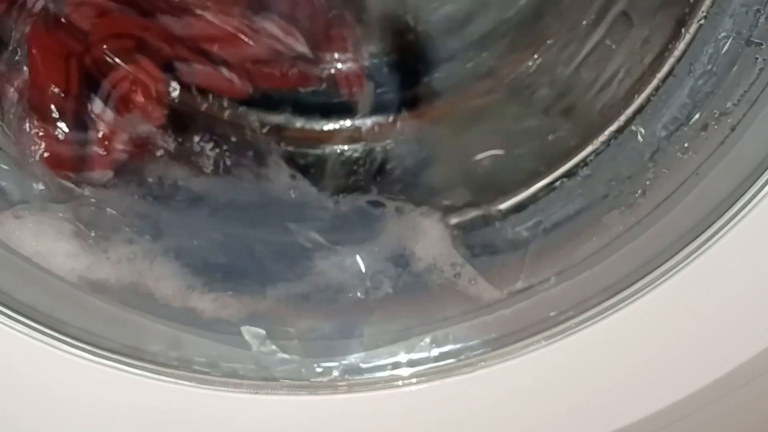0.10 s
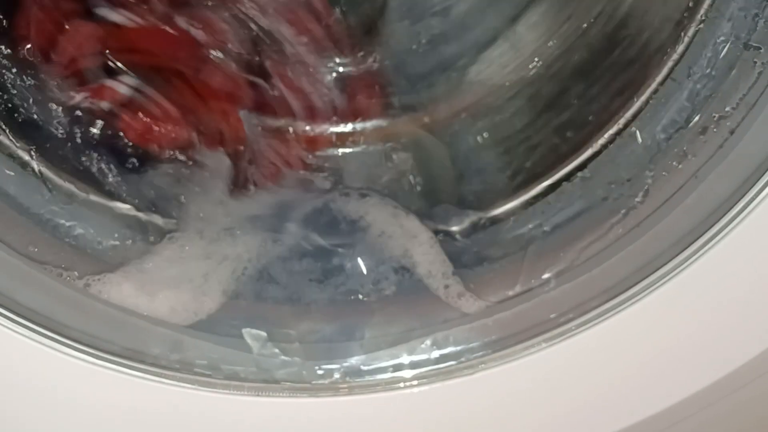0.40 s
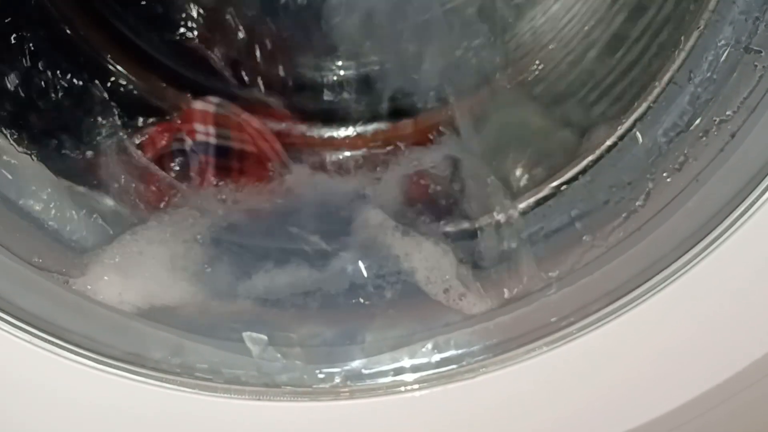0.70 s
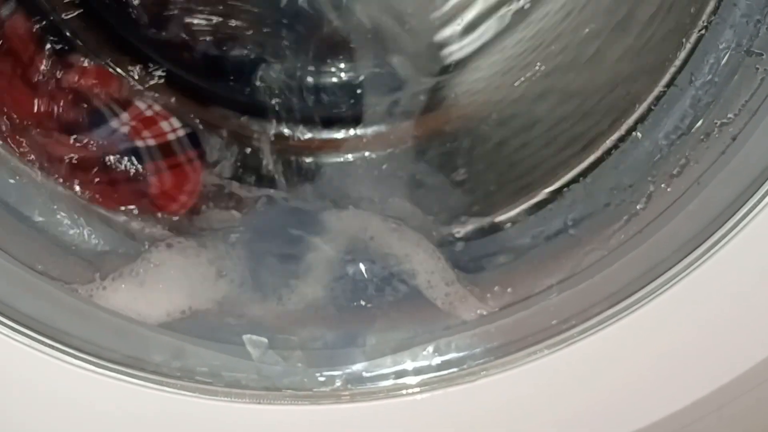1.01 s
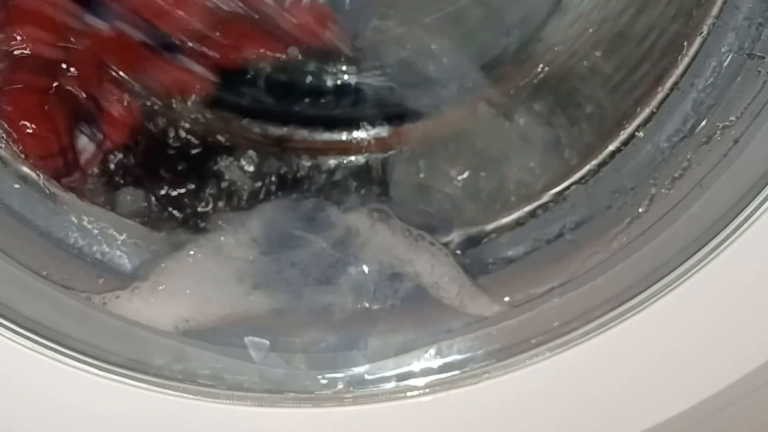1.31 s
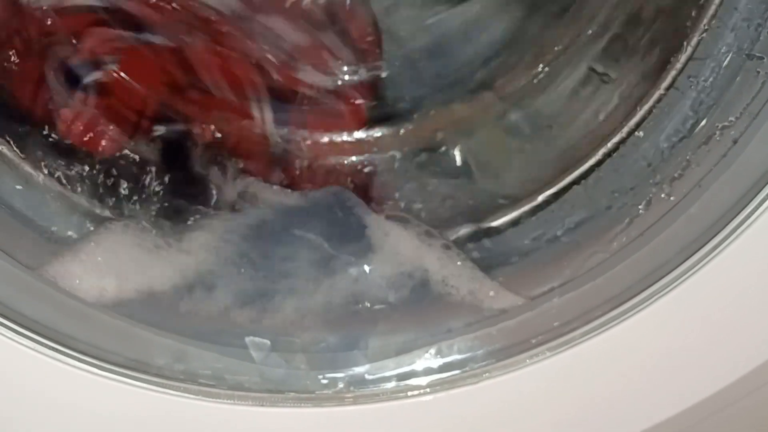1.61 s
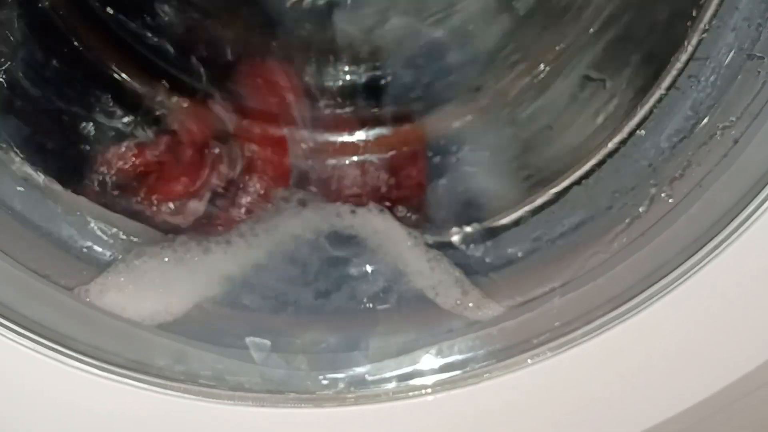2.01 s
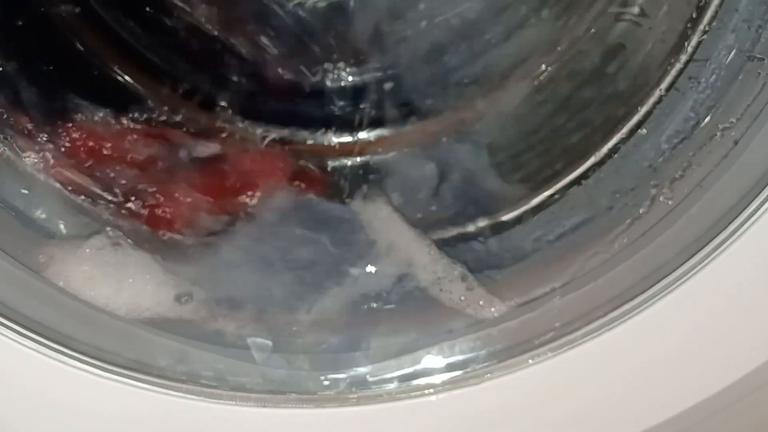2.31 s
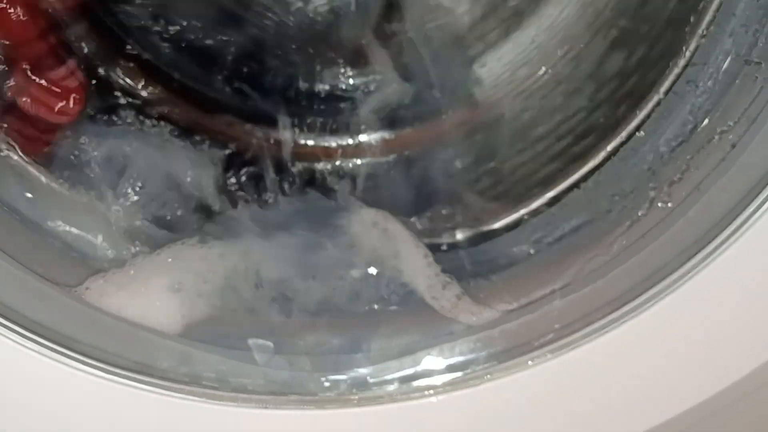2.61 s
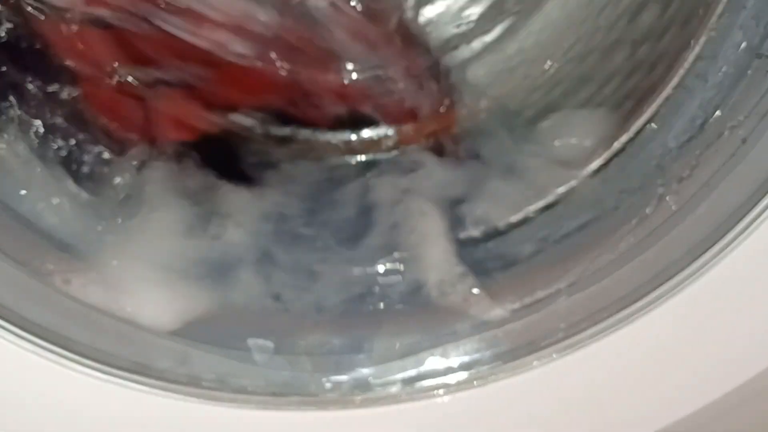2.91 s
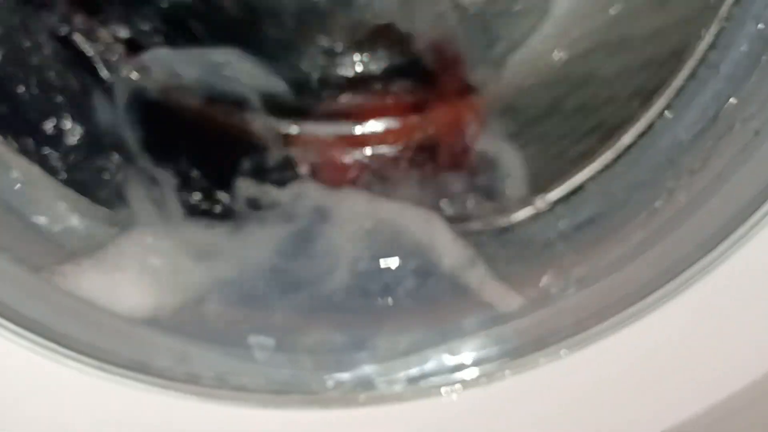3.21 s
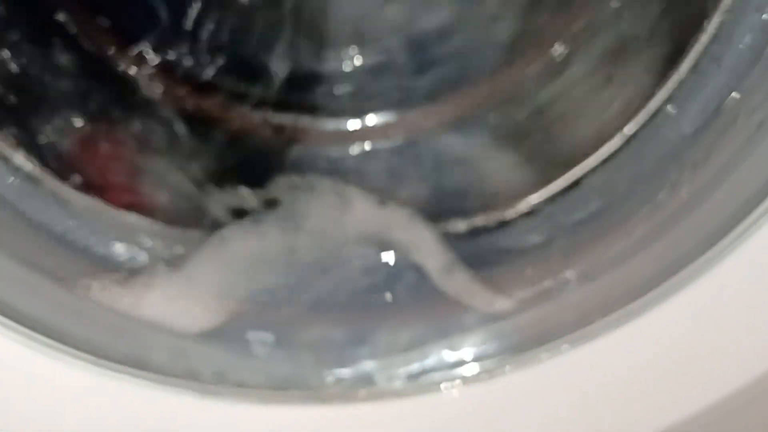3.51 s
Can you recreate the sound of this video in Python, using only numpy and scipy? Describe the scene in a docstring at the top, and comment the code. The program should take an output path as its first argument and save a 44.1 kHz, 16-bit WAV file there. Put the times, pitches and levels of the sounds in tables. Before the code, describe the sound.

A washing machine sloshes throughout, close at the glass door, with hissing suds, fine bubbling and low churning in a resonant tub. Wet laundry slaps and thuds from 0.2 s; a hard knock cracks at 0.35 s, then a heavy thud with a tick near 0.6 s. Softer thuds follow around 1.0, 1.7 and 2.1 s, with a gurgle at 2.2 s, a broad thump at 3.2 s and gurgling at 3.65 s.

```python
"""Washing machine tumbling wet laundry

A front loader heard close to the glass door. Churning water and falling cloth ring the tub's modes; short low
pushes give the thuds punch. Suds hiss as shaped random spectra, with sine-pip bubbles, ringing gurgles,
noise-burst slaps and ticks on the glass. One hard part of a garment knocks on the door: decaying sines and a
noise crack. The left microphone port is turned away and hears less treble."""
import sys
import numpy as np
from scipy import signal
from scipy.fft import rfft, irfft
from scipy.io import wavfile
from scipy.ndimage import uniform_filter1d

SR = 44100
rng = np.random.default_rng(int(sys.argv[2]) if len(sys.argv) > 2 else 0)


def materialize(psi):
    """Save the field psi as 16-bit PCM at rate SR to the path in sys.argv[1].

    A 1-D psi becomes a single channel; in a 2-D psi each row is a channel.
    """
    bounded = np.clip(np.atleast_2d(psi).T, -1, 1)
    quanta = np.round(bounded * 32767).astype(np.int16)
    wavfile.write(sys.argv[1], SR, quanta)


N = 163170
T = np.arange(N) / SR

# swells of the splash: (time [s], mids [dB], treble [dB], fine spray [dB]), relative levels
SWELLS = [(0.0, -48.5, -54, -67.5), (0.15, -48, -51.5, -62.5), (0.35, -44, -50, -61),
          (0.48, -48, -49, -62.5), (0.65, -45, -48.5, -62.5), (0.79, -50, -52, -65),
          (1.02, -47.5, -52.5, -65.5), (1.15, -46, -48.5, -63), (1.28, -45.5, -50.5, -63),
          (1.47, -48.5, -50.5, -64), (1.72, -48.5, -51, -64.5), (2.0, -47.5, -53.5, -65),
          (2.2, -47, -47.5, -64.5), (2.43, -49, -50.5, -65), (3.0, -47, -50.5, -62.5),
          (3.22, -49, -49.5, -65.5), (3.4, -49, -54.5, -66), (3.7, -51.5, -48.5, -63.5)]
# spectrum of the suds: (frequency [Hz], level [dB])
SUDS_SPECTRUM = [(60, -30.5), (300, 13.5), (430, -12), (800, -1.5), (1300, -3.5), (2000, -6.5), (2900, -16),
                 (3700, -13.5), (5300, -17.5), (6200, -25.5), (8000, -31.5), (10000, -28.5), (12000, -26),
                 (14000, -27.5), (15700, -31)]
# spectrum of the push of the water on the tub: (frequency [Hz], level [dB])
PUSH_SPECTRUM = [(40, -24), (70, 0.5), (900, -3), (2000, -27), (5000, -62)]
TUB_ALIKE = 0.96  # correlation of the noise drive between the ports
BUBBLE_CLIMB = 0.047  # scales the pitch climb of bubbles and gurgles


def gain_of(db):
    """Amplitude factor of a level in dB."""
    return 10 ** (np.asarray(db) / 20)


def evened(x):
    """Scales to an RMS of 1."""
    return x / np.sqrt(np.mean(x ** 2) + 1e-20)


def read(points, hz):
    """Interpolates a (frequency, value) table over log frequency."""
    f, value = np.transpose(points)
    return np.interp(np.log(hz + 1), np.log(f + 1), value)


def coloured(x, points):
    """Filters by a (frequency [Hz], level [dB]) table."""
    n = x.shape[-1]
    return irfft(rfft(x) * gain_of(read(points, np.fft.rfftfreq(n, 1 / SR))), n)


def resonate(x, hz, width_hz):
    """Two-pole resonance of gain 1 at its peak."""
    return signal.lfilter(*signal.iirpeak(hz, hz / width_hz, SR), x)


def band(x, hz, width_share):
    """Two equal resonances in a row, each as wide as a share of its pitch."""
    return resonate(resonate(x, hz, hz * width_share), hz, hz * width_share)


def add(mix, start_s, sound):
    """Adds a sound from a given time, cut at the end of the mix."""
    part = mix[..., round(start_s * SR):][..., :sound.shape[-1]]
    part += sound[..., :part.shape[-1]]


def pair(n, alike):
    """White noise for two ports with a given correlation."""
    a, b = rng.standard_normal((2, n))
    return np.array([a, alike * a + np.sqrt(1 - alike ** 2) * b])


def drift(samples):
    """Slow random curve of RMS 1: noise averaged twice."""
    once = uniform_filter1d(rng.standard_normal(N), size=samples)
    return evened(uniform_filter1d(once, size=samples))


def burst(start_s, length_s, rise_s):
    """Envelope of thuds and slaps: linear rise, hold, exponential fall."""
    fall_s = 0.02
    rise = np.clip((T - start_s) / rise_s, 0, 1)
    return rise * np.exp(-np.maximum(T - start_s - length_s, 0) / fall_s)


def splash():
    """Hiss of suds: random short-time spectra with drifting patches, shared flicker and swells."""
    treble_hz, spray_hz = 1860, 6500  # crossovers of the swells
    frames, hz = N // 128 + 6, np.fft.rfftfreq(512, 1 / SR)
    a, b, c, d, patches = rng.standard_normal((frames, 257, 5)).T
    patches = uniform_filter1d(uniform_filter1d(patches, size=7, axis=0), size=14, axis=1)
    flicker = evened(uniform_filter1d(rng.standard_normal(frames), size=8))
    flicker_db = (0.8 + 0.49 * (hz[:, None] > 7500)) * flicker

    s, mids, treble, spray = np.transpose(SWELLS)
    t = np.arange(frames) * 128 / SR
    high = (1 / (1 + (treble_hz / (hz + 1)) ** 4))[:, None]
    top = (1 / (1 + (spray_hz / (hz + 1)) ** 6))[:, None]
    shares = [(1 - high, mids), (high - top, treble), (top, spray)]
    swell_db = sum(share * np.interp(t, s, db - db.mean()) for share, db in shares)

    alike = read([(300, 0.99), (550, 0.18), (1500, 0.059), (8000, 0.12)], hz)[:, None]
    right = alike * (a + 1j * b) + np.sqrt(1 - alike ** 2) * (c + 1j * d)
    spectra = np.array([a + 1j * b, right])
    spectra *= gain_of(read(SUDS_SPECTRUM, hz)[:, None] + swell_db + 1.18 * evened(patches) + flicker_db)
    return gain_of(-40) * evened(signal.istft(spectra, nperseg=512, noverlap=384)[1][:, :N])


def bubbles():
    """Small bubbles: short climbing sine pips, denser in random clumps and louder in the swells."""
    level_db, clump_db = -47, 5.5
    per_s = 300  # mean rate per port ahead of the clumping
    cycles = 12.9  # time scale of a pip, which peaks at a third of it
    out = np.zeros((2, N))
    swell = gain_of(np.interp(T, *np.transpose(SWELLS)[:2]))
    clumps = gain_of(clump_db * np.tanh(drift(1500)))
    for hz in np.geomspace(500, 5500, 24):
        t = np.arange(0, 3 * cycles / hz, 1 / SR)
        u = t * hz / cycles
        pip = u * np.exp(-3 * u) * np.sin(2 * np.pi * hz * t * (1 + BUBBLE_CLIMB * u))
        pip *= gain_of(read(SUDS_SPECTRUM, hz))
        starts = rng.random((2, N)) < clumps * per_s / 24 / SR
        sizes = gain_of(2.4 * np.minimum(rng.exponential(size=(2, N)), 3))
        out += signal.oaconvolve(starts * sizes * swell, pip[None])[:, :N]
    return gain_of(level_db) * evened(out)


def gurgles():
    """Large bubbles ring as they burst: each sine swells, climbs a little in pitch and dies."""
    # large bubbles: (time [s], peak level [dB], pitch [Hz])
    gurgle_table = [(2.165, -40.5, 740), (2.175, -37, 1950), (3.642, -39.5, 1900), (3.674, -37, 2010)]
    peak_s = 0.0104  # from the start to the peak
    out, u = np.zeros((2, N)), np.arange(5000) / SR / peak_s
    phases = rng.random((len(gurgle_table), 2))  # [turns], one per port
    for (s, db, hz), phase in zip(gurgle_table, phases):
        turns = np.cumsum(hz * (1 + BUBBLE_CLIMB * np.tanh((u - 1) / 2))) / SR
        add(out, s, gain_of(db) * u * np.exp(1 - u) * np.sin(2 * np.pi * (turns + phase[:, None])))
    return out


def slaps():
    """Wet slaps on the glass: lumpy bursts of band noise, nearly independent at the two ports."""
    # slaps: (time [s], level [dB], centre [Hz], length [s])
    slap_table = [(0.234, -33.5, 740, 0.037), (0.216, -39.5, 1140, 0.043), (0.333, -34, 660, 0.028),
                  (0.249, -38, 450, 0.036), (1.0, -44.5, 1500, 0.088), (1.174, -42, 856, 0.067),
                  (2.082, -57, 11500, 0.034), (2.291, -41, 1270, 0.023), (2.526, -43, 880, 0.067),
                  (2.847, -45.5, 1280, 0.084), (3.189, -37.5, 694, 0.092), (3.198, -39.5, 464, 0.128),
                  (3.277, -38.5, 770, 0.055), (3.659, -39, 720, 0.044)]
    rise_s, width_share, lumps_db = 0.008, 0.51, 1
    lumps = gain_of(lumps_db * drift(200))
    out = np.zeros((2, N))
    for s, db, hz, length_s in slap_table:
        noise = evened(band(pair(N, 0.029), hz, width_share))
        out += gain_of(db) * burst(s, length_s, rise_s) * noise
    return lumps * out


def ticks():
    """Buttons and drops on the glass: short puffs of band noise with a small tail inside the drum."""
    # ticks: (time [s], level [dB], centre [Hz])
    tick_table = [(0.582, -34, 2370), (0.583, -42, 4200), (1.306, -53, 13300), (1.684, -54, 12100),
                  (1.687, -44, 4500), (2.096, -42.5, 3800), (2.1348, -39.5, 4600), (2.173, -48, 10500),
                  (2.671, -50, 14300), (2.938, -48, 10700), (3.048, -48, 5100)]
    decay_s, tail_s, tail_db, width_share = 0.003, 0.011, -8, 0.3
    out, t = np.zeros((2, N)), np.arange(5000) / SR
    fall = np.exp(-t / decay_s) + gain_of(tail_db) * np.exp(-t / tail_s)
    shape = np.minimum(t / 0.0002, 1) * fall
    for s, db, hz in tick_table:
        noise = evened(band(pair(len(t), 0.51), hz, width_share))
        add(out, s - 0.002, gain_of(db) * shape * noise)  # starts 2 ms ahead of the listed time
    return out


def churning():
    """Push of the churning water on the tub: low noise with a lumpy level."""
    # churning: (time [s], level [dB])
    churn_table = [(0.0, -38.5), (0.15, -39), (0.3, -30), (0.48, -33.5), (0.58, -34), (0.78, -39.5),
                   (1.02, -39), (1.17, -32), (1.48, -39), (2.23, -35), (2.41, -37), (2.61, -39),
                   (2.88, -34.5), (3.04, -33.5), (3.18, -36.5), (3.44, -39), (3.7, -41)]
    level_db = np.interp(T, *np.transpose(churn_table)) + 1.36 * drift(500)
    return coloured(pair(N, TUB_ALIKE), PUSH_SPECTRUM) * gain_of(level_db)


def tub():
    """Churning and laundry falling into the water ring the modes of tub and cabinet."""
    # falling laundry: (time [s], level [dB], centre [Hz], length [s], rise [s], spread [octaves])
    thud_table = [(0.238, -21.5, 165, 0.024, 0.011, 0.59), (0.354, -25.5, 165, 0.015, 0.004, 0.71),
                  (0.568, -18.5, 193, 0.027, 0.0055, 0.61), (0.647, -24, 163, 0.035, 0.007, 0.38),
                  (0.763, -25, 126, 0.019, 0.0075, 0.23), (0.971, -24, 125, 0.04, .004, 0.42),
                  (1.15, -32, 280, 0.053, 0.015, 0.83), (1.508, -31, 274, 0.033, .005, 0.65),
                  (1.682, -27, 195, 0.087, 0.0062, 1.12), (1.931, -33, 284, 0.018, .005, 0.74),
                  (2.092, -26.5, 127, 0.037, .01, 0.34), (2.144, -26.5, 215, 0.058, 0.018, 0.55),
                  (2.526, -33, 282, 0.085, 0.01, 0.55), (2.842, -37.5, 310, 0.11, 0.015, 0.85),
                  (3.167, -19, 280, 0.06, 0.067, 0.52), (3.288, -27.5, 246, 0.057, .02, 0.69)]
    # tub and cabinet: (frequency [Hz], level [dB], ring down to -86 dB [s], left minus right [dB])
    mode_table = [(67.4, -15, 0.46, -3), (78, -30.5, 0.73, -4), (130.4, -15, 0.21, -5),
                  (170.2, -9.5, 0.16, -6), (206.1, -12.5, 0.16, -2), (258, -16, 0.069, -9),
                  (283.4, -10.5, 0.22, -2.5), (332.5, -15, 0.35, 5.5), (385.6, -23.5, 1, 8),
                  (536, -22, 0.04, 18), (708, -22, 0.036, 16.5)]
    rough_share = 0.25  # noise in the thuds
    churn = churning()
    noise, out = coloured(pair(N, TUB_ALIKE), PUSH_SPECTRUM), np.zeros((2, N))
    shapes = np.array([burst(s, length_s, rise_s) for s, _, _, length_s, rise_s, _ in thud_table])
    _, level_db, centre_hz, _, _, spread = np.transpose(thud_table)
    phases = 2 * np.pi * rng.random((len(mode_table), len(thud_table)))
    for (hz, db, ring_s, pan_db), phase in zip(mode_table, phases):
        width_hz = 3.14 / ring_s
        norm = np.sqrt(SR / width_hz / np.pi)  # evens noise power over bandwidths
        gains = gain_of(level_db - 7.8 * (np.log2(hz / centre_hz) / spread) ** 2)
        shake = (gains * np.cos(phase)) @ shapes * np.sin(2 * np.pi * hz * T)
        shake += (gains * np.sin(phase)) @ shapes * np.cos(2 * np.pi * hz * T)
        rough = rough_share * norm * noise * (gains @ shapes)
        drive = norm * churn + rough + 2 * shake
        out += gain_of(db + np.array([[pan_db / 2], [-pan_db / 2]])) * resonate(drive, hz, width_hz)
    return out


def thud_punches():
    """Short, low pushes at the onset of and within the thuds of falling laundry, each a cycle or two."""
    # punches of the thuds: (time [s], envelope peak [dB], pitch [Hz])
    punch_table = [(0.2575, -30, 230), (0.583, -23, 180), (0.5962, -18.5, 257), (.607, -19, 204),
                   (1.697, -22.5, 183), (1.7244, -26.5, 244), (1.7344, -23.5, 248)]
    peak_cycles = 0.46  # from the start to the envelope peak
    out, t = np.zeros((2, N)), np.arange(3000) / SR
    for s, db, hz in punch_table:
        u = t * hz / peak_cycles
        add(out, s, -gain_of(db) * u * np.exp(1 - u) * np.sin(2 * np.pi * hz * t))
    return out


def knock():
    """A soft-edged knock rings door and cabinet as sines, with a bright noise crack and a short rattle."""
    # ring of door and cabinet: (frequency [Hz], level [dB], t60 [s])
    door_table = [(62.6, -33, 0.35), (83, -20.5, 0.29), (347.4, -15, 0.16), (440, 4.5, 0.014),
                  (600, -9, 0.02), (960, -31, 0.027), (1330, -25, 0.029), (6900, -36, 0.057)]
    # spectrum of crack and rattle: (frequency [Hz], level [dB])
    crack_spectrum = [(300, -45), (1500, -8), (3000, -5.5), (6000, -4.5), (7000, 2), (8000, -10),
                      (10000, -15), (11300, 3), (13500, 3), (15000, -17), (15700, -21)]
    start_s, rise_s = 0.343, 0.0021
    ring_db, crack_db, rattle_db = -4, -28.5, -46
    out, t = np.zeros((2, N)), np.arange(9000) / SR
    rise = np.minimum(t / rise_s, 1)
    ring = sum(gain_of(db - 60 * t / t60_s) * np.sin(2 * np.pi * hz * t) for hz, db, t60_s in door_table)
    shape = gain_of(crack_db) * np.exp(-(t / 0.0072) ** 2) + gain_of(rattle_db) * np.exp(-t / 0.046)
    crack = shape * evened(coloured(pair(len(t), 0.18), crack_spectrum))
    add(out, start_s, rise * (gain_of(ring_db) * ring + crack))
    return out


def scene():
    """Air resonances of the drum colour the wet sounds, whose upper part reaches the left port later."""
    # air resonances of the drum: (frequency [Hz], width [Hz], lift [factor])
    drum_table = [(726, 20, 0.67), (971, 13, 0.14), (1330, 21, 0.16), (1540, 25, 0.46), (1850, 43, 0.4),
                  (2026, 34, 0.79), (2630, 200, 0.54), (3726, 70, 0.4)]
    lag_s, lag_hz = 0.001261, 443  # no lag below lag_hz
    wet = splash() + bubbles() + gurgles() + slaps()
    wet = wet + sum(lift * resonate(wet, hz, width_hz) for hz, width_hz, lift in drum_table) + ticks()
    low = signal.sosfiltfilt(signal.butter(2, lag_hz, fs=SR, output="sos"), wet[0])
    left = low + np.roll(wet[0] - low, round(lag_s * SR))
    return tub() + thud_punches() + knock() + np.array([left, wet[1]])


def record(dry):
    """Port resonances, the shaded left port, the low cut, then the band limit."""
    # port resonances: (frequency [Hz], width [Hz], left lift [factor], right lift [factor])
    port_table = [(6960, 370, 1, 1.4), (11800, 1900, .1, 0.43)]
    # left port against right: (frequency [Hz], level [dB])
    shade_spectrum = [(400, 2.5), (1000, -3), (2200, -1.5), (2900, -3), (4200, -9.5), (6400, -5.5),
                      (8500, -4.5), (10000, -13.5), (12500, -18), (14500, -9), (15700, 0)]
    low_cut_hz, edge_hz = 58, 15650
    lifted = dry + sum(np.array([[left], [right]]) * resonate(dry, hz, width_hz)
                       for hz, width_hz, left, right in port_table)
    ports = np.array([coloured(lifted[0], shade_spectrum), lifted[1]])
    ports = signal.sosfilt(signal.butter(6, low_cut_hz, "high", fs=SR, output="sos"), ports)
    band_limit = signal.firwin(1023, edge_hz, window=("kaiser", 9), fs=SR)
    return signal.oaconvolve(ports, band_limit[None], "same")


dry = scene()
out = record(dry)
materialize(out)
```